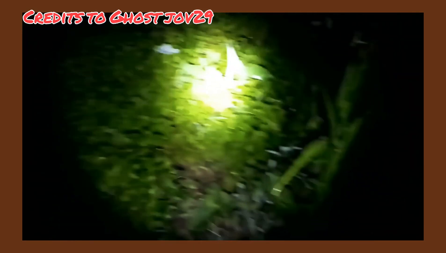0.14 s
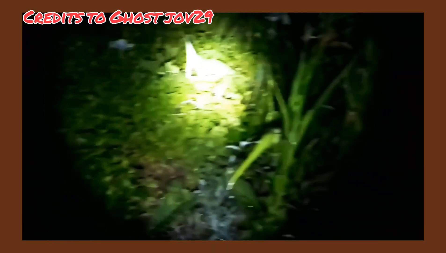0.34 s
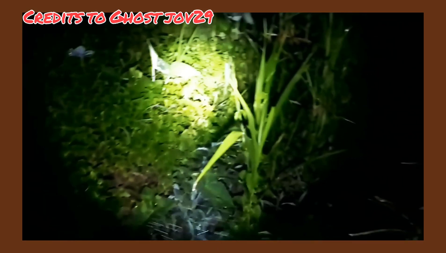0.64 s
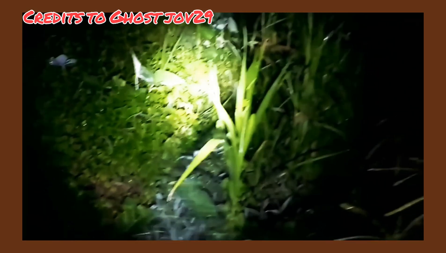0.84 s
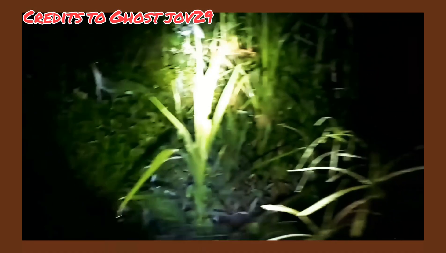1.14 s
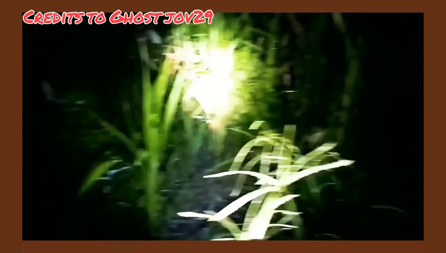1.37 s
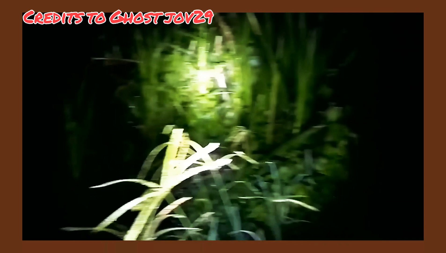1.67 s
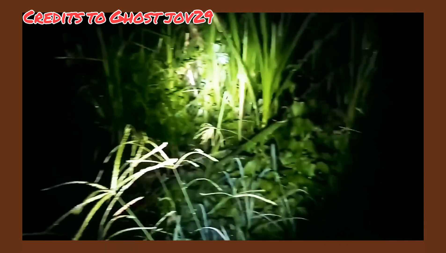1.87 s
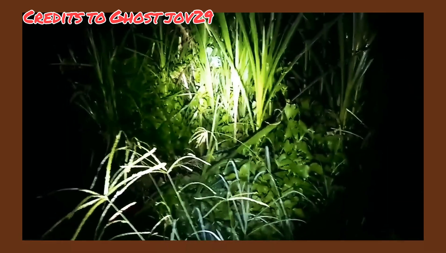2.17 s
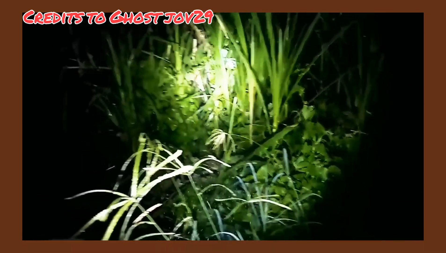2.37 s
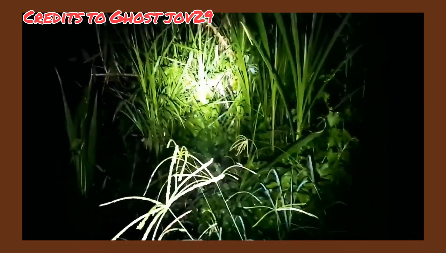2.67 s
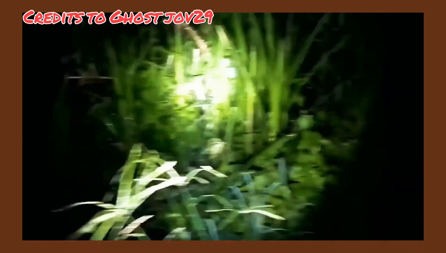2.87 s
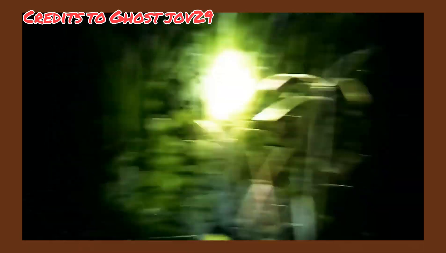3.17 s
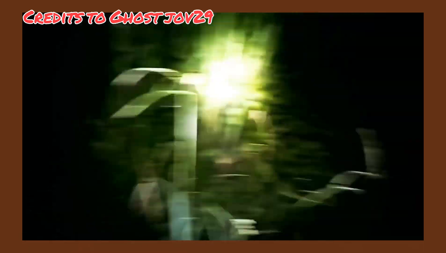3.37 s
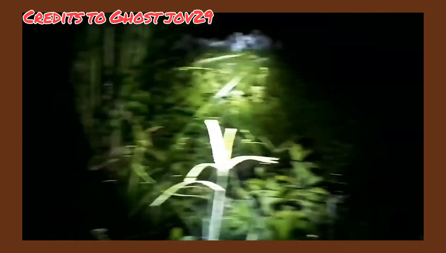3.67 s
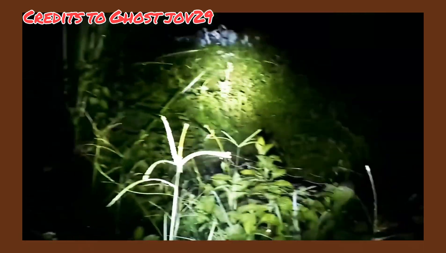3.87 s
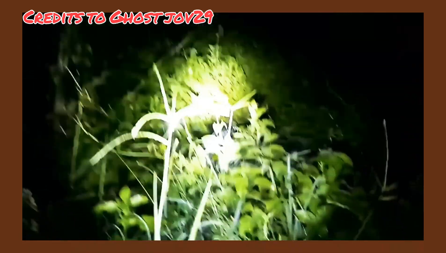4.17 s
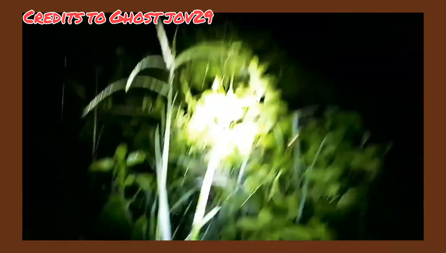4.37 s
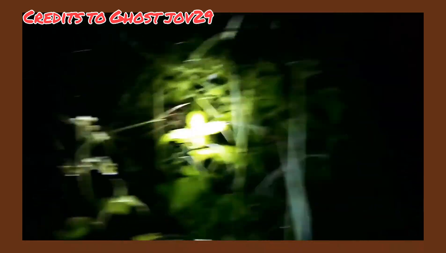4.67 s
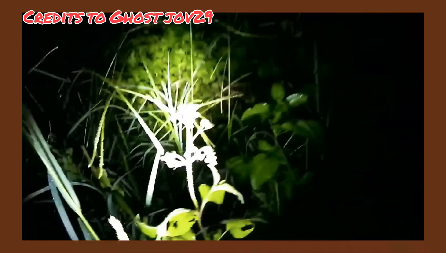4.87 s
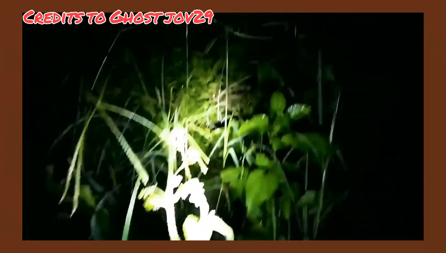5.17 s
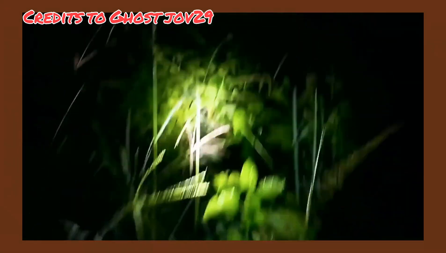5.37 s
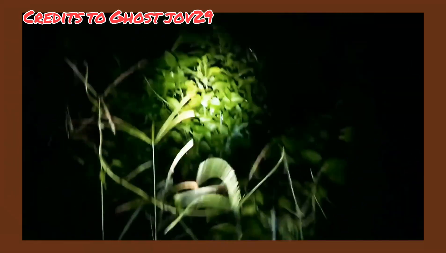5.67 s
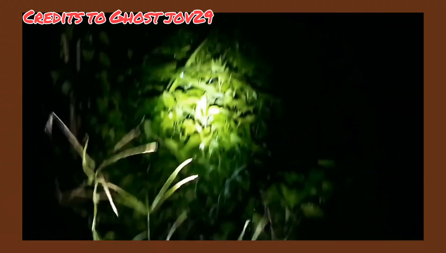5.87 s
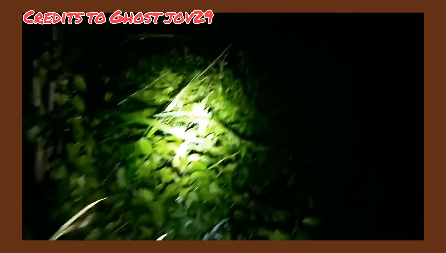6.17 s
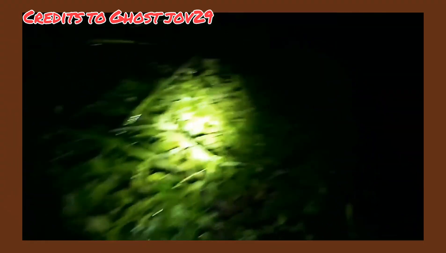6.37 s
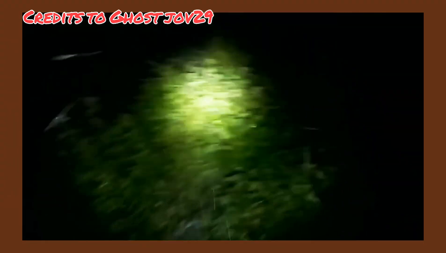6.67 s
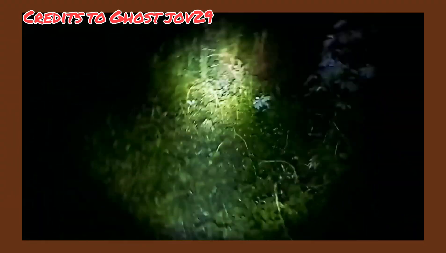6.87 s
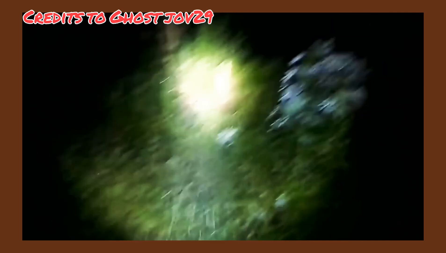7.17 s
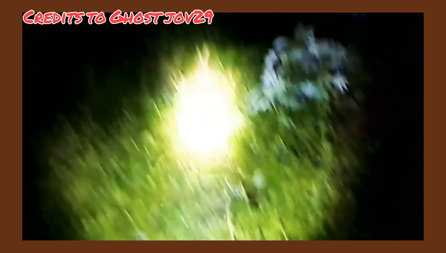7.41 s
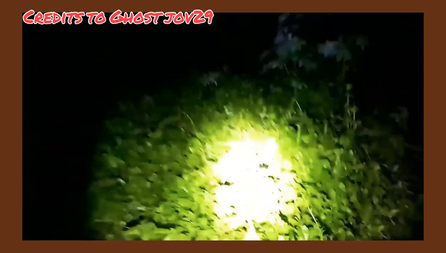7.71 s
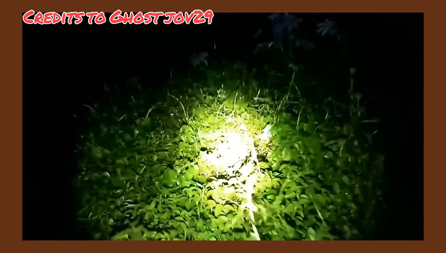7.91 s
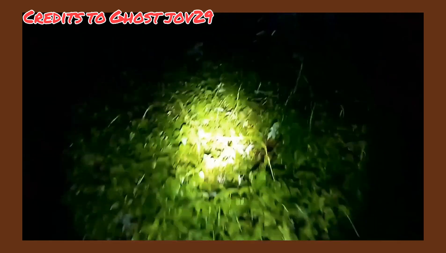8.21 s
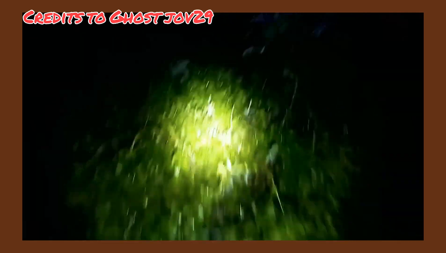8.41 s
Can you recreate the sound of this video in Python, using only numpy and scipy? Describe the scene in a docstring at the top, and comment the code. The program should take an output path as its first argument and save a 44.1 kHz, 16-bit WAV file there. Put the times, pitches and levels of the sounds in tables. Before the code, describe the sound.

A damp forest at night, heard from a microphone carried by a walker. Throughout, a dense cricket chorus shimmers around 6.3 kHz over fluttering distant insect hiss, a merged far trill near 3.5 kHz and a faint low rumble. Nearer trills of about a third of a second purr at roughly 52 pulses a second, repeatedly overlapping. Soft leaf swishes come at 0.4 and 1 s, with small stem snaps around 1.5 s; foliage almost settles from 2 to 3.3 s. A brush at 3.6 s leads into busier wading from 4.1 s: swishes, rasping blades at 4.8 and 5.1 s, stems cracking, strongest rustling around 5.4 and 6.3 s. At 7.1 s a sharp twig crack meets a dull heavy footfall; more swishes, snaps and ticks follow at 7.5-7.9 s. Single close cricket strokes appear from 5.2 s and cluster loudly at 8.3-8.5 s.

```python
"""A dense cricket chorus near 6.3 kHz, with deeper singers below it, fills a damp forest at night: sine wing strokes.
Close by, one cricket's loud strokes stand out and trains of tone pulses trill near 3.5 kHz; far trillers merge.
Far bush crickets are a fluttering noise hiss. Someone wades slowly through grass and leaves with a hand-held
microphone: filtered noise and crackle for the plants, short noise bursts for stems, twigs and a heavy foot.
The trees scatter the calls and the snaps into a short noise tail; a low rumble lies under it all."""
import sys
import numpy as np
from scipy import signal
from scipy.fft import rfft, irfft, next_fast_len
from scipy.io import wavfile
from scipy.ndimage import uniform_filter1d

SR = 44100
rng = np.random.default_rng(int(sys.argv[2]) if len(sys.argv) > 2 else 0)


def wav_out(sig):
    """Save sig, one row per channel (or a flat mono array), as 16-bit PCM at SR to the path in sys.argv[1]."""
    wavfile.write(sys.argv[1], SR, np.round(np.clip(np.atleast_2d(sig).T, -1, 1) * 32767).astype(np.int16))


N = 376878


def amp(db):
    """Decibels to gain."""
    return 10 ** (np.asarray(db) / 20)


def unit(x):
    """x at rms 1."""
    return x / np.sqrt(np.mean(x ** 2) + 1e-20)


def along(points, hz):
    """Read (frequency, value) points on a log frequency axis."""
    f, v = np.transpose(points)
    return np.interp(np.log(hz + 1), np.log(f + 1), v)


def curves(rows):
    """One value per sample for each column after the time."""
    s, *cols = np.transpose(rows)
    return [np.interp(np.arange(N) / SR, s, c) for c in cols]


def wobble(rate):
    """A random curve with rate knots a second."""
    knots = rng.standard_normal(int(N * rate / SR) + 2)
    return np.interp(np.arange(N) * rate / SR, np.arange(len(knots)), knots)


def filtered(x, response):
    """x through a gain that is a function of frequency."""
    m = next_fast_len(len(x) + 8192)  # silence after x keeps its end from wrapping round
    return irfft(rfft(x, m) * response(np.fft.rfftfreq(m, 1 / SR)), m)[:len(x)]


def coloured(x, spectrum):
    """x through a table of gains, at rms 1."""
    return unit(filtered(x, lambda hz: amp(along(spectrum, hz))))


def patchy(x, depth_db):
    """Raise and lower small patches of time and frequency, so the colour keeps shifting as in moving leaves."""
    z = signal.stft(x, nperseg=512)[2]
    field = uniform_filter1d(rng.standard_normal(z.shape), size=4, axis=0)  # smooth over frequency
    field = uniform_filter1d(field, size=6, axis=1)  # smooth over time
    return signal.istft(z * amp(depth_db * unit(field)), nperseg=512)[1][:N]


def add(track, s, sound):
    """Mix a sound in at s seconds."""
    part = track[round(s * SR):][:len(sound)]
    part += sound[:len(part)]


def sine(pitch_hz):
    """A tone that follows a pitch curve."""
    return np.sin(2 * np.pi * np.cumsum(pitch_hz) / SR)


# How long the trees ring at each pitch: pitch_hz, t60_s
FOREST = [(300, .3), (3500, 0.67), (10000, 0.07)]


def forest(x, wet_db):
    """Trunks and leaves scatter a sound into a short tail; the power stays about the same."""
    hz, t, z = signal.stft(rng.standard_normal(SR // 2), SR, nperseg=256)
    decay = amp(-60 * t / along(FOREST, hz)[:, None])
    tail = signal.istft(z * decay, SR, nperseg=256)[1]
    echo = signal.fftconvolve(x, tail)[:N]
    return (x + amp(wet_db) * np.std(x) * unit(echo)) / np.hypot(1, amp(wet_db))


# Colour of the low rumble: pitch_hz, relative level_db
RUMBLE = [(10, 3.5), (30, -1.5), (60, 0), (100, -4), (170, -11), (350, -17.5), (700, -30.5), (3000, -40)]


def low_rumble():
    """Slowly swaying low noise lies under the whole scene."""
    return amp(-46.5 + 1.7 * wobble(5)) * coloured(rng.standard_normal(N), RUMBLE)


# Colour of the far bush crickets: pitch_hz, relative level_db
FAR_HISS = [(3500, -22), (4500, -17), (5100, -11), (5700, 5.5), (6800, 4.5), (7200, 1), (7700, -1.5),
            (8700, -2.5), (9300, -10), (10200, -22.5), (13000, -48)]


def far_bush_crickets():
    """Far bush crickets blend into a hiss of noise that flutters quickly and sways slowly."""
    flutter_db = 0.71 * wobble(110)
    hiss = coloured(patchy(rng.standard_normal(N), depth_db=1.0) * amp(flutter_db), FAR_HISS)
    sway_db = .4 * wobble(3)
    return amp(-34.5 + sway_db) * hiss


def stroke(place, duty):
    """The wing sounds while it closes, the first share (duty) of each cycle."""
    return np.sin(np.pi * np.clip(place / duty, 0, 1))


DRIFT_SHARE = .006  # slow wander of each chorus singer's pitch


def chorus(voices, count, rate, duty, glide, unsteady, detune, scatter_db):
    """Many singers, each with its own pitch and rate; strokes differ, and the pitch sags through each."""
    out = np.zeros(N)
    for hz in np.linspace(voices[0][0], voices[-1][0], count):
        speed = rate * np.exp(.12 * rng.standard_normal() + unsteady * wobble(12))
        number, place = np.divmod(rng.random() + np.cumsum(speed) / SR, 1)  # which stroke, how far through it
        offset, force = rng.standard_normal((2, SR))[:, number.astype(int)]
        sag = glide * (place / duty - .5)
        pitch = hz * (1 - sag + detune * offset + DRIFT_SHARE * wobble(2))
        size = amp(along(voices, hz) + scatter_db * np.clip(force, -2, 1.5))
        out += size * stroke(place, duty) * sine(pitch)
    return unit(out)


TRILL_RATE_HZ = 52.4  # typical wing strokes a second of the trillers, near and far

# Level of the distant trillers: time_s, level_db
LOW_CHORUS = [(0, -37.5), (1, -40.5), (2.2, -38.5), (3, -39.5), (3.7, -37.5), (4.7, -35.5), (5.4, -41),
              (6.1, -40.5), (6.9, -38), (8.1, -38.5), (8.55, -37.5)]
# How loud the distant trillers of each pitch are: pitch_hz, relative level_db
LOW_VOICES = [(3310, -11), (3390, -3), (3460, 5.5), (3525, -10), (3600, -9)]


def far_trills():
    """Distant trillers merge into one unbroken tone, blurred by the trees."""
    level_db, = curves(LOW_CHORUS)
    crowd = chorus(LOW_VOICES, count=9, rate=TRILL_RATE_HZ, duty=.6, glide=.008,
                   unsteady=0.05035, detune=0.00298, scatter_db=4.0)
    return amp(level_db) * forest(crowd, wet_db=-1.0)


# A leg or foot pushes through the plants:
# loudest_s, length_s, then tread_db, brush_db, crisp_db before each layer's trim
SWISHES = [(0.364, 0.27, -48, -46, -57), (1.02, 0.1, -50, -52, -67), (3.575, 0.19, -69, -51, -64),
           (4.105, 0.12, -55, -43.5, -52), (4.234, 0.2, -51, -49, -54), (4.406, 0.078, -48, -41.5, -57),
           (4.934, 0.099, -42.5, -44, -58), (5.125, 0.087, -44, -47, -68), (5.245, .06, -42, -45, -55),
           (5.378, 0.14, -37.5, -39.5, -47), (5.464, 0.12, -37.5, -36.5, -48),
           (5.586, 0.068, -42.5, -41, -50), (6.04, 0.18, -46.5, -39.5, -49),
           (6.32, 0.22, -38, -39.5, -42.5), (6.482, 0.085, -43, -40, -56), (6.76, .05, -47, -38.5, -46),
           (7.09, 0.12, -39.5, -43, -60), (7.489, 0.075, -35, -36.5, -60), (7.58, 0.15, -44, -39.5, -52),
           (7.78, 0.28, -45.5, -43, -50), (8.146, 0.13, -50, -64, -48), (8.352, 0.11, -45, -42.5, -47)]
# Stirred plants rustling between the swishes: time_s, level_db against the thick of the walk
STIR = [(0, -20), (.7, -11.5), (1.3, -11.5), (2.8, -32), (3.35, -12), (3.9, -16.5), (4.2, -1), (4.6, -8.5),
        (5.3, -1.5), (5.8, -0.5), (6.3, -2), (7.4, 3.5), (8.1, -2), (8.55, -2)]
# Stirred plants in the thick of the walk: tread_db, brush_db, crisp_db before trim
STIR_DB = [-48, -47.5, -55]
# Foliage at rest: tread_db, brush_db, crisp_db before trim
STILL_DB = [-59, -64, -58.5]
RISE_SHARE, EDGE_DB = 0.39, 6  # part of a swish before its peak; how far it is down at both ends


def wading():
    """Levels of tread, brush and crisp: each swish swells and dies over stirred and resting foliage."""
    t, (stir_db,) = np.arange(N) / SR, curves(STIR)
    power = amp(STILL_DB)[:, None] ** 2 + np.outer(amp(STIR_DB), amp(stir_db)) ** 2
    for s, length, *levels_db in SWISHES:
        away = np.maximum((s - t) / RISE_SHARE, (t - s) / (1 - RISE_SHARE)) / length
        near = away < 10
        power[:, near] += np.outer(amp(levels_db), amp(-EDGE_DB * away[near])) ** 2
    return 10 * np.log10(power)


def crackle(spectrum, density, spread_db, share):
    """Countless small leaf contacts of uneven size (density a second) over a smooth swish."""
    size = amp(spread_db * np.minimum(rng.exponential(size=N), 3))
    contacts = (rng.random(N) < density / SR) * rng.choice([-1, 1], N) * size
    swish = np.sqrt(share) * unit(contacts) + np.sqrt(1 - share) * rng.standard_normal(N)
    return coloured(patchy(swish, depth_db=2.5), spectrum)


# Colour of feet on the litter: pitch_hz, relative level_db
TREAD = [(60, -5), (150, -2.5), (330, 0), (700, -3.5), (1200, -7.5), (1800, -12), (3000, -41)]
# Colour of legs on the leaves: pitch_hz, relative level_db
BRUSH = [(600, -12.5), (1300, -6), (1800, -1), (2450, 0), (3000, -9.5), (3600, -2), (4500, 0.5), (5500, 1),
         (7000, 6.5), (8500, -2.5), (10000, -27), (15000, -27)]
# Colour of dry blades: pitch_hz, relative level_db
CRISP = [(4000, -11), (7000, 12.5), (9000, 7), (10500, 1), (12500, -1), (15500, -5)]


def undergrowth():
    """Feet press the litter, legs brush the leaves, dry blades crackle."""
    tread_db, brush_db, crisp_db = wading()
    tread_db = tread_db - 1.0 + 1.25 * wobble(45)
    brush_db = brush_db + 9.5 + 0.85 * wobble(60)
    crisp_db = crisp_db + 8.5 + 0.62 * wobble(80)
    tread = amp(tread_db) * crackle(TREAD, density=500, spread_db=4.5, share=0.38)
    brush = amp(brush_db) * crackle(BRUSH, density=900, spread_db=3.0, share=0.33)
    crisp = amp(crisp_db) * crackle(CRISP, density=1500, spread_db=1.5, share=0.18)
    return tread + brush + crisp


# Grass blades rubbing past: middle_s, length_s, pitch_hz, level_db at the middle
SCRAPES = [(1.034, .06, 1690, -46.5), (4.79, 0.2, 950, -47.5), (5.107, .17, 1180, -41)]


def scrapes(width=0.32):
    """A long blade sliding past rasps around one pitch: noise through a broad resonance."""
    out = np.zeros(N)
    for s, length, pitch, db in SCRAPES:
        swell = np.hanning(int(length * SR))
        noise = rng.standard_normal(len(swell))
        rasp = filtered(noise, lambda hz: 1 / (1 + ((hz / pitch - 1) / width) ** 2))
        add(out, s - length / 2, amp(db) * swell * unit(rasp))
    return out


def bursts(rows, t60, octaves):
    """Short dying noise bursts, each centred on its own pitch and spread over some octaves."""
    out, t = np.zeros(N), np.arange(SR // 4) / SR
    for s, db, pitch in rows:
        noise = filtered(rng.standard_normal(len(t)),
                         lambda hz: np.exp(-.5 * (np.log2((hz + 1) / pitch) / octaves) ** 2))
        crack = noise * amp(-60 * t / t60) * (1 - np.exp(-2 * t * pitch))
        add(out, s, amp(db) * crack / np.abs(crack).max())
    return out


# Heavy footfall: start_s, peak_db, pitch_hz
THUDS = [(7.108, -31.5, 60.5)]


def footfall():
    """A foot lands heavily: a low burst that dies quickly."""
    return bursts(THUDS, t60=0.13, octaves=0.37)


# Stems underfoot: start_s, peak_db before the trees, pitch_hz
SNAPS = [(1.469, -29, 2420), (1.571, -33, 2080), (4.483, -23, 2330), (4.904, -29, 600), (5.189, -28, 458),
         (5.554, -23, 921), (6.172, -26, 864), (6.325, -28, 716), (7.47, -21, 638), (7.762, -29, 2150)]
# Dry twigs: start_s, peak_db before the trees, pitch_hz
TICKS = [(6.753, -21, 7500), (7.0768, -5.5, 4800), (7.0768, -25, 1700), (7.474, -23, 1900),
         (7.72, -18, 7500), (7.777, -12, 6800), (7.881, -20, 4800)]


def breaking_stems():
    """Stems snap in broad cracks and dry twigs in shorter, narrower ticks, with a trace of echo."""
    stems = bursts(SNAPS, t60=0.028, octaves=1.17)
    twigs = bursts(TICKS, t60=.008, octaves=.24)
    return forest(stems + twigs, wet_db=-33)


# Single trills: start_s, length_s, pitch_hz, level_db
TRILLS = [(.07, 0.27, 3480, -37), (.48, 0.32, 3440, -39.5), (1.14, 0.35, 3543, -41.5),
          (1.161, .38, 3280, -49), (1.2, 0.27, 3460, -39.5), (1.85, 0.31, 3457, -36),
          (2.02, 0.14, 5290, -44.5), (2.17, .23, 3484, -34), (2.40, 0.41, 3320, -43.5),
          (2.41, 0.12, 5328, -44.5), (2.42, 0.33, 3606, -38.5), (2.45, 0.99, 3460, -44),
          (2.84, 0.34, 4070, -54), (3.20, 0.35, 3496, -40), (3.47, .46, 3596, -38),
          (3.55, 0.4, 3330, -38.5), (3.7, 0.46, 3464, -37), (4.32, 0.34, 3600, -39),
          (4.32, 0.385, 3496, -33), (4.77, .39, 3610, -36.5), (4.98, 0.38, 3437, -36),
          (5.51, 0.28, 3464, -36.5), (5.68, 0.41, 3615, -36), (6.2, 0.49, 3430, -36.5),
          (6.64, 0.31, 3563, -35.5), (6.76, 0.16, 3420, -34), (6.92, .68, 3490, -40.5)]
RATE_SPREAD = 0.026  # how much the stroke rates of the trills differ, as a share
STROKE_SCATTER_DB, STROKE_DETUNE = 1.3, .0012  # how strokes differ in level and, as a share, in pitch
FAR_DB = -44  # a trill weaker than this comes from deep among the trees


def near_trills(edge=.05, duty=0.82, glide=0.014, scatter_db=0.4, jitter=0.0011):
    """Trains of uneven pulses swell and fade; pitch lifts as the wing speeds up. Far ones arrive blurred."""
    near, far = np.zeros((2, N))
    for start, length, hz, db in TRILLS:
        t = np.arange(int((length + edge / 2) * SR)) / SR
        rate = TRILL_RATE_HZ * (1 + RATE_SPREAD * rng.standard_normal())
        number, place = np.divmod(rng.random() + t * rate, 1)
        offset, force = rng.standard_normal((2, SR))[:, number.astype(int)]
        lift = glide * (place - .5)
        pitch = hz * (1 + lift + STROKE_DETUNE * offset + jitter * wobble(65.1)[:len(t)])
        swell = np.clip(np.minimum(t, t[-1] - t) / edge, 0, 1)
        uneven = amp(STROKE_SCATTER_DB * force + scatter_db * wobble(40.8)[:len(t)])
        trill = amp(db) * unit(swell * uneven * stroke(place, duty) * sine(pitch))
        add(far if db < FAR_DB else near, start - edge / 4, trill)
    return forest(near, wet_db=-12) + forest(far, wet_db=3)


# Wing strokes of one close cricket: start_s, peak_db before the trees
STROKES = [(5.232, -23), (5.281, -18), (5.329, -21), (5.354, -13.5), (5.394, -19.5), (5.808, -18),
           (5.906, -18), (5.922, -15), (6.271, -18.5), (6.852, -18.5), (7.683, -19.5), (7.776, -19),
           (8.083, -17.5), (8.276, -15), (8.393, -14), (8.421, -12.5), (8.463, -10.5), (8.488, -11),
           (8.531, -14.5)]


def close_cricket(length=0.013, pitch_hz=6380, sag=0.012):
    """Single loud strokes stand out of the chorus, each a tone sagging in pitch."""
    out, u = np.zeros(N), np.arange(int(length * SR)) / (length * SR)
    for s, db in STROKES:
        pitch = pitch_hz * (1 + 0.00098 * rng.standard_normal() - sag * u)
        swell = np.sin(np.pi * u ** 0.5)  # quick rise, slower fall
        add(out, s, amp(db) * swell * sine(pitch))
    return forest(out, wet_db=-8)


# Level of the two crowds before each one's trim: time_s, deep_db, high_db
CRICKETS = [(0.0, -35.5, -29.5), (3.68, -35.5, -28), (4.25, -31.5, -27.5), (4.73, -34.5, -28.5),
            (5.91, -37.5, -29.5), (6.39, -30.5, -29.5), (7.12, -38.5, -30.5), (7.79, -34, -28),
            (8.2, -33.5, -28)]
# How loud the deeper crickets of each pitch are: pitch_hz, relative level_db
DEEP_VOICES = [(5620, -18.5), (5780, 1.5), (5930, -1.5), (6120, 5.5)]
# How loud the higher crickets of each pitch are: pitch_hz, relative level_db
HIGH_VOICES = [(6170, -7), (6330, -0.5), (6500, -1), (6620, -7), (6740, -11.5)]


def cricket_chorus():
    """Two crowds of crickets, deeper and higher, whose overlapping wing strokes make a dense shimmer."""
    deep_db, high_db = curves(CRICKETS)
    deep = chorus(DEEP_VOICES, count=14, rate=42, duty=.42, glide=.025,
                  unsteady=.12, detune=.01, scatter_db=1.5)
    high = chorus(HIGH_VOICES, count=16, rate=42, duty=.4, glide=.025,
                  unsteady=.12, detune=.007, scatter_db=2.0)
    crowd = amp(deep_db + 2.0) * deep + amp(high_db + 0.74) * high
    return forest(crowd, wet_db=-10.5)


def scene():
    """Insects and walker at one microphone."""
    background = low_rumble() + far_bush_crickets() + far_trills()
    walker = undergrowth() + scrapes() + footfall() + breaking_stems()
    insects = near_trills() + close_cricket() + cricket_chorus()
    return (background + walker + insects)[None]


TOP_HZ = 15500  # band limit of the recorder


def record(dry):
    """The recorder keeps nothing above its band limit."""
    return np.array([filtered(channel, lambda hz: hz < TOP_HZ) for channel in dry])


dry = scene()
out = record(dry)
wav_out(out)
```